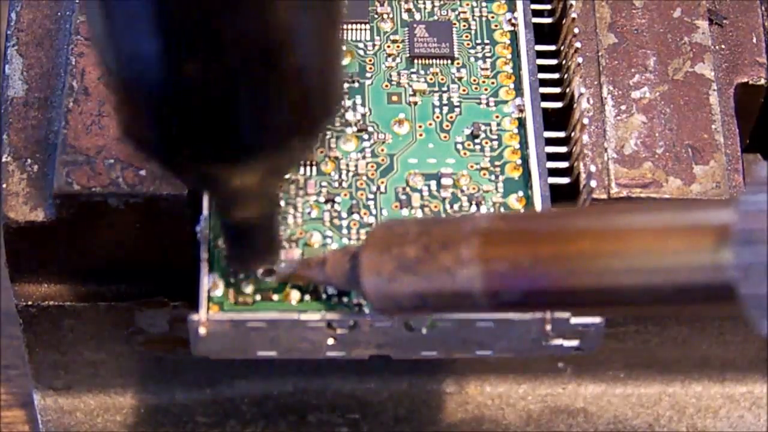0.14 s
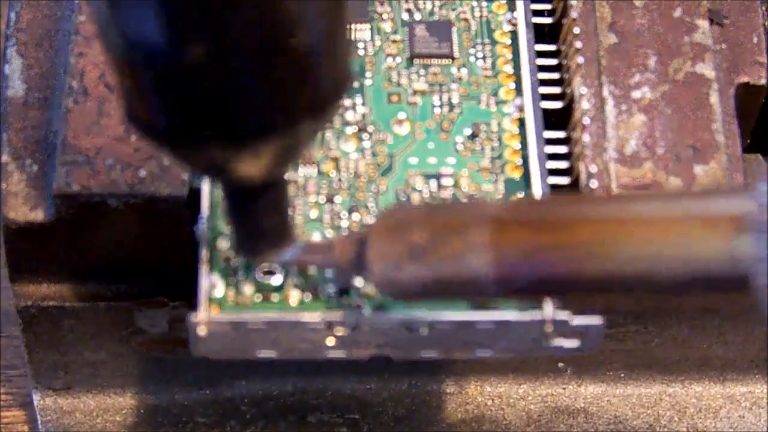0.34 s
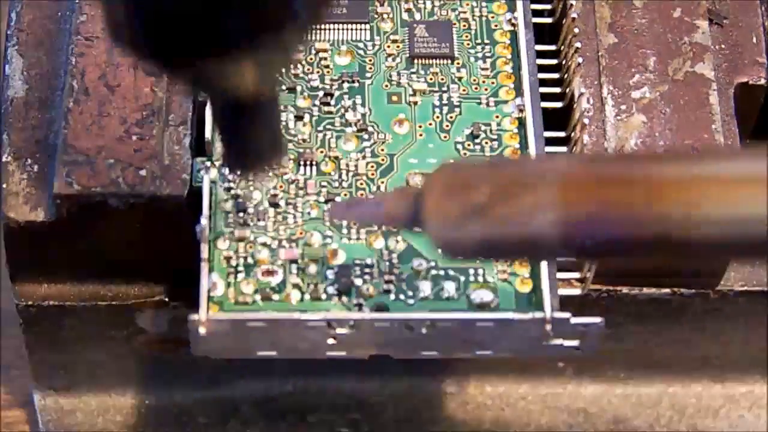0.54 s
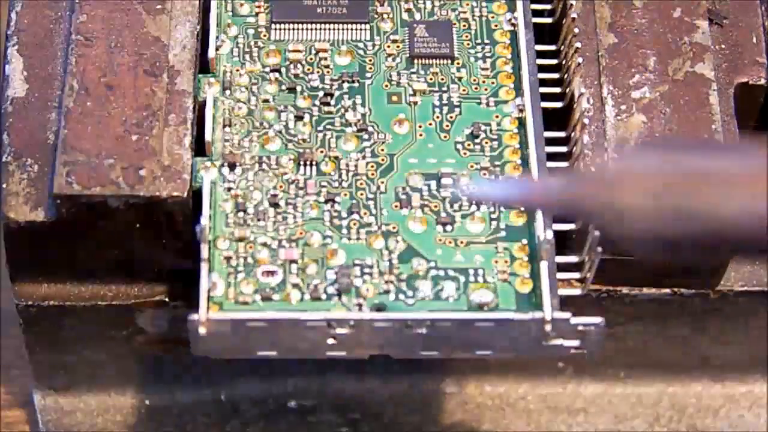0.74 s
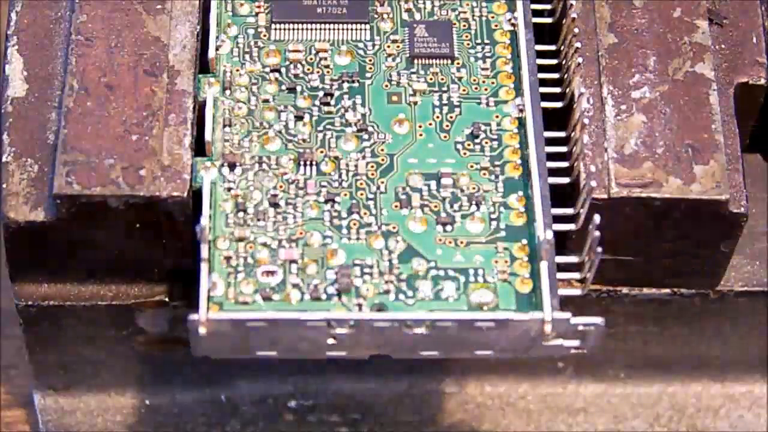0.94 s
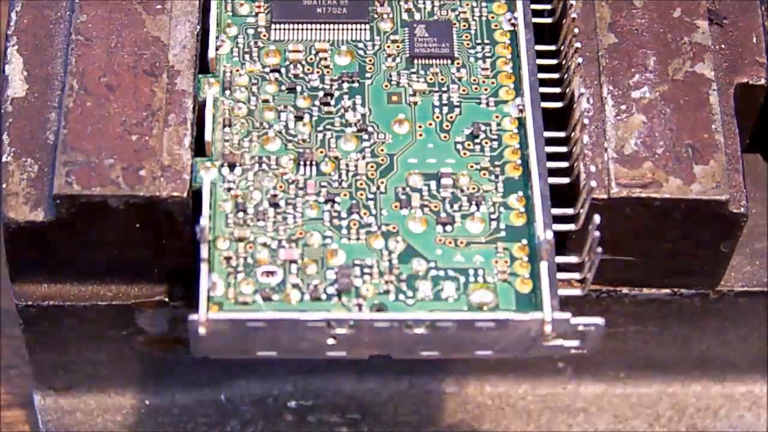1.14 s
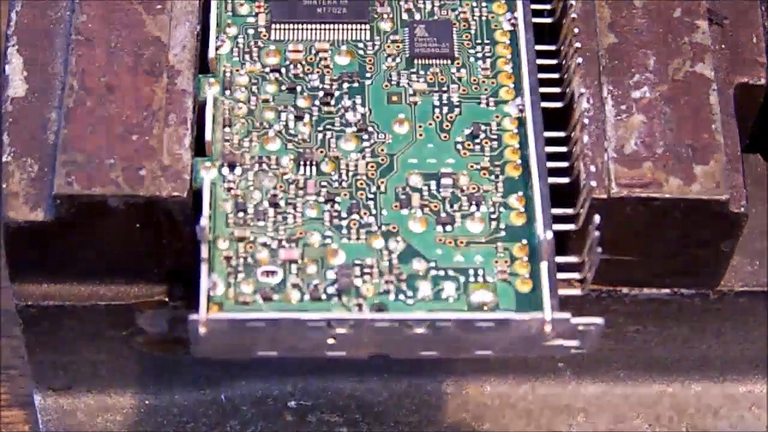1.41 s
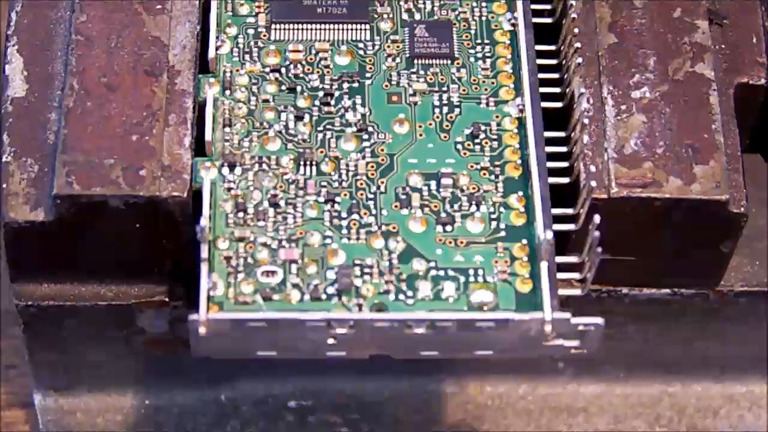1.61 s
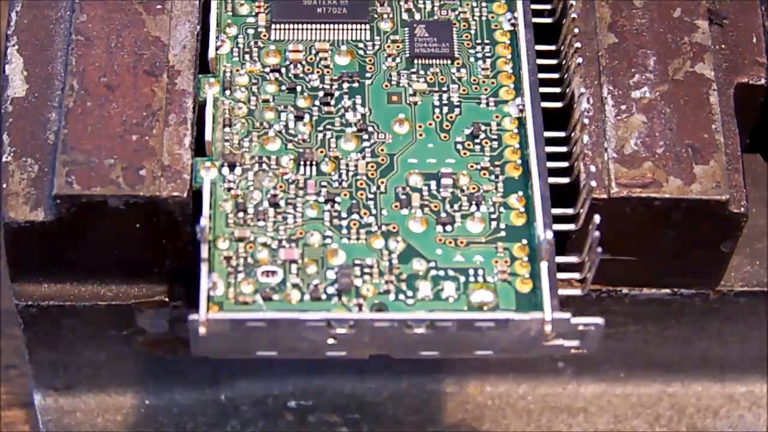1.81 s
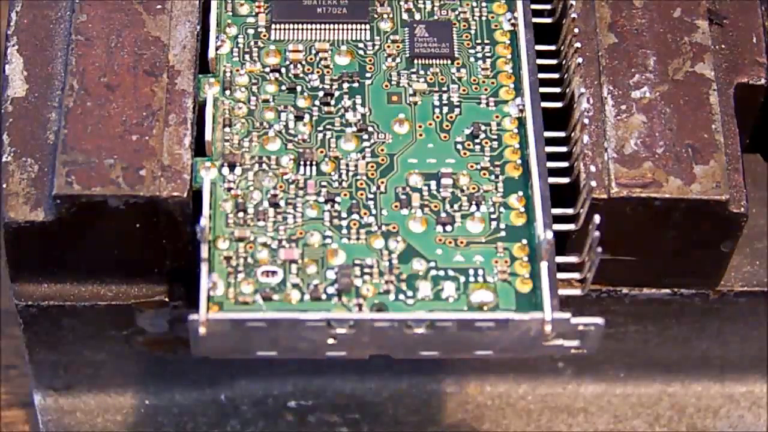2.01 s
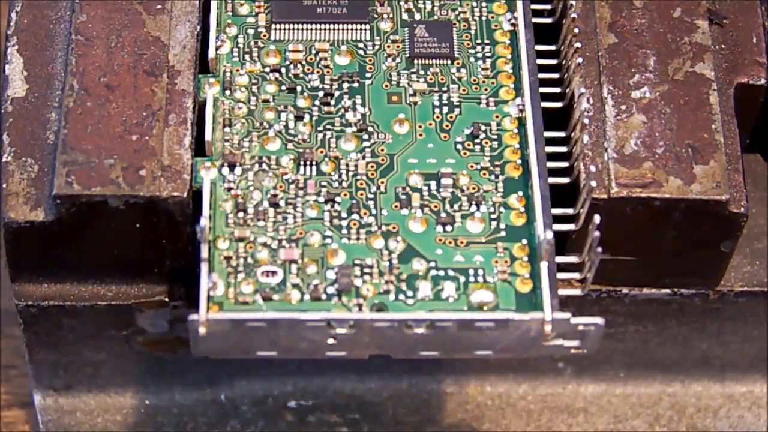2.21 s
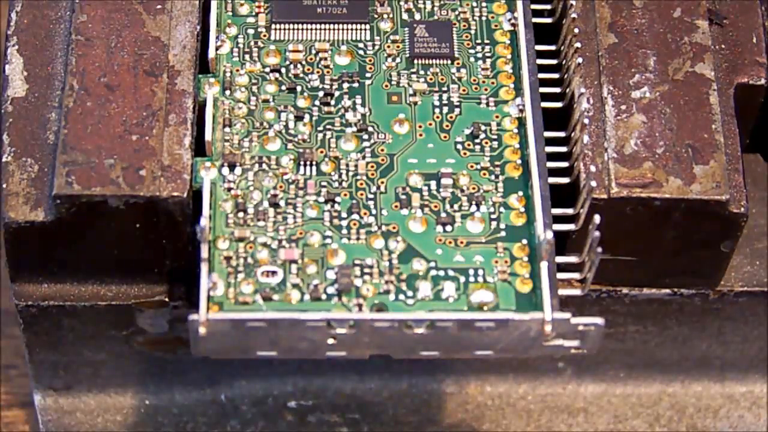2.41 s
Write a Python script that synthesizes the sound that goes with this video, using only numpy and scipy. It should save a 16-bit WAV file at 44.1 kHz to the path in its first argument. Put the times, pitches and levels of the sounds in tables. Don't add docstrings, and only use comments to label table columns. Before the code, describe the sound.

A solder pump snaps explosively at 0.2 s, its piston slamming and rebounding within about 15 milliseconds, with hollow barrel ring and low bench thud. The overloaded close microphone ducks, then recovers over the half-second room tail. Tiny ticks come before and after. Steady dull hiss and very faint hum remain. From 1.68 to 1.85 s a metal tool rattles onto the bench at left, bright, uneven clinks fading quickly.

```python
import sys
import numpy as np
from scipy import signal
from scipy.fft import rfft, irfft, next_fast_len
from scipy.io import wavfile
from scipy.ndimage import uniform_filter1d, map_coordinates

SR = 44100
rng = np.random.default_rng(int(sys.argv[2]) if len(sys.argv) > 2 else 0)


def volts_from_db(level):
    exponent = np.asarray(level, float) / 20
    return 10 ** exponent


def digitize_waveform(pressure):
    field = np.atleast_2d(pressure).T
    bounded = np.clip(field, -1, 1)
    quanta = np.round(bounded * 32767).astype(np.int16)
    wavfile.write(sys.argv[1], SR, quanta)


N = 112454

# pitch_hz, level_db (per Hz)
HISS_COLOUR = [(20, 0.5), (45, 0), (90, -4.5), (200, -5.5), (450, -15), (1000, -16), (7000, -23),
               (8000, -42)]
# pitch_hz, likeness (-1 to 1)
HISS_ALIKE = [(60, .2), (300, .5), (1400, 0.48), (7000, .4)]
# pitch_hz, width_hz, level_db
DISTANT_HUM = [(164.7, 14, -0.5), (392, 11.63, -1), (439.3, 13.7, -1), (620, 19.6, -9.5)]
# pitch_hz, width_hz, level_db
EARLIER_RING = [(1911, 43, -0.5), (2624, 92, 1), (3400, 61, -2.5), (4100, 80, -2), (4991, 68, -1),
                (5370, 96.4, -2.5), (623, 83, -8.5)]
# start_s, level_db, pitch_hz, length_cycles
TICKS = [(0.163, -45.5, 2800, 0.88), (.2032, -47.5, 2270, 3), (.234, -7, 4470, 3.4),
         (0.2403, -19.5, 4250, 5.8), (.433, -50, 4500, 0.68), (.4502, -28, 4200, 2.5),
         (.4504, -26, 7000, 1.1), (0.477, -58, 5230, 0.86), (.6806, -38, 3400, 0.91),
         (1.436, -48, 260, 2.5), (1.44, -46.5, 900, 1.5), (1.985, -43.5, 5640, 2)]
# start_s, level_db, chatter_s
SLAMS = [
    (.2082, -1, .0007),
    (.2089, 2, .0017),
    (.2127, -4, .0005),
    (.2161, 1.5, .0032),
    (.2235, -15, .004),
]
# pitch_hz, width_hz, level_db
BARREL = [(684, 140, -11), (1820, 220, 0.5), (2470, 340, -5.5), (3280, 340, -1), (3915, 410, -6.5),
          (4240, 110, -2.5), (4770, 430, -7.5), (5958, 89, -5.5), (6540, 33, -1), (6967, 55, 2)]
# pitch_hz, level_db (per Hz)
BARE_BLOW = [(120, -41.5), (200, -5.5), (1330, -12), (2560, -11.5), (2930, -12.5), (4760, -4), (7500, -7),
             (9750, -36.5), (16500, -120)]
# pitch_hz, level_db
SLAM_WIDTH = [(200, -13.5), (1000, -10), (3000, -9), (6000, 0.5)]
# pitch_hz, width_hz, level_db
THUD = [(199.8, 60, 3.5), (690, 110, -11), (850, 70, -6)]
# pitch_hz, level_db, fade_60db_s
BENCH = [(108, -10, .25), (129, -6.5, 0.35), (202.3, -2, 0.25), (65, -8, .3), (382.6, -4, 0.047),
         (520, -12, .08)]
# pitch_hz, width_hz, level_db
ECHO_BANDS = [(690, 120, -0.5), (820, 110, -1), (1970, 300, -0.5), (2620, 200, 1), (3783, 300, 1.5),
              (5200, 400, -2.5), (7000, 500, 2.5)]
# start_s, level_db, focus_hz (centre of the tones struck), shaft_db, boom_db
DROPS = [(1.6842, -13, 5300, -6.5, -25), (1.725, -22.5, 3400, -15, -23), (1.755, -28.5, 3060, -4, -12.5),
         (1.7676, -22.5, 3400, -12.5, -26.5), (1.7776, -17.5, 6700, -11, -25),
         (1.7801, -12.5, 4500, -16, -26), (1.779, -13, 2050, -21, -41), (1.794, -20, 5700, -18.5, -32),
         (1.8235, -16.5, 3520, -9.5, -33.5), (1.831, -14, 5360, -5.5, -31),
         (1.848, -18.5, 4200, -22.5, -20.5), (1.853, -20, 6030, -21, -31)]
# start_s, level_db, pitch_hz, length_cycles
STRIKES = [
    (1.6846, -17, 6640, 11),
    (1.6846, -16.5, 4880, 10),
    (1.725, -20.5, 6900, 7.7),
    (1.7682, -25, 7000, 5),
    (1.7775, -10.5, 6630, 6.7),
    (1.7775, -21.5, 5120, 12),
    (1.8226, -17, 5500, 2),
    (1.8244, -20, 5200, 4.8),
    (1.8307, -19, 5100, 5.6),
]
# pitch_hz, level_db, fade_60db_s
TOOL_TONES = [(2035, -12.5, 0.062), (2221, -19, 0.18), (2700, -12.5, .06), (3350, 2.5, 0.025),
              (3734, -7, .08), (4200, -8, .06), (4430, -4.5, 0.069), (4780, -12, 0.11), (5300, -7.5, 0.092),
              (5600, -25, 0.046), (6100, -7.5, .07), (6900, -15.5, 0.16), (6905, -1, 0.033),
              (7170, -28.5, 0.24)]
# pitch_hz, level_db, fade_60db_s
SHAFT_TONES = [(1148, -5.5, .08), (1284, 6, 0.03), (1429, 2.5, .07), (1467, -4.5, 0.12)]
# pitch_hz, level_db (per Hz)
CLATTER = [(150, -68), (500, -20.5), (1000, -19), (1400, -13), (2500, -4), (4500, -5.5), (6800, -0.5),
           (8000, -28)]
# pitch_hz, fade_60db_s
ROOM_FADE = [(100, .6), (700, 0.48), (3000, .5), (7500, .4)]
# pitch_hz, level_db
ROOM_COLOUR = [(60, -10), (250, 2), (550, -1.5), (750, 6), (1100, 2.5), (1700, 0.5), (3000, 0.5),
               (7000, -2)]
# pitch_hz, likeness (-1 to 1)
ROOM_ALIKE = [(60, 0.91), (240, 0.89), (950, 0.65), (3770, 0.04), (15000, -0.03)]
# pitch_hz, width_hz, depth (0 to 1)
MIC_DIPS = [(290, 113.3, 1), (972, 29, .8)]


def unit(x):
    return x / np.sqrt(np.mean(x ** 2) + 1e-20)


def along(points, hz):
    f, v = np.transpose(points)
    return np.interp(np.log(hz + 1), np.log(f + 1), v)


def filtered(x, response):
    n = x.shape[-1]
    m = next_fast_len(n + SR // 2)
    return irfft(rfft(x, m) * response(np.fft.rfftfreq(m, 1 / SR)), m)[..., :n]


def resonance(f, centre, width):
    return 1j * f * width / (centre * centre - f * f + 1j * f * width)


def resonant(peaks):
    return lambda f: sum((-1) ** k * volts_from_db(db) * resonance(f, c, w) for k, (c, w, db) in enumerate(peaks))


def pair(n, alike):
    turn = lambda hz: np.arccos(np.clip(along(alike, hz), -1, 1)) / 2
    shares = lambda hz: np.array([np.cos(turn(hz)), np.sin(turn(hz))])
    mid, side = filtered(rng.standard_normal((2, n)), shares)
    return np.array([mid + side, mid - side])


def ring(modes, t, extra_db=0):
    hz, db, t60 = np.transpose(modes)[:, :, None]
    luck = rng.standard_normal((len(modes), 2))
    level = volts_from_db(db + extra_db + 2 * luck[:, :1] - 60 * t / t60)
    return np.sum(level * np.sin(2 * np.pi * hz * t + luck[:, 1:]), 0)


def add(track, s, sound):
    part = track[..., round(s * SR):][..., :sound.shape[-1]]
    part += sound[..., :part.shape[-1]]


def clicks(rows):
    out, t = np.zeros(N), np.arange(SR // 20) / SR
    for s, db, hz, cycles in rows:
        add(out, s, volts_from_db(db) * np.exp(-t * hz / cycles) * np.sin(2 * np.pi * hz * t))
    return out


def room(x):
    hz, t, z = signal.stft(pair(SR, ROOM_ALIKE), SR, nperseg=256)
    fade_db = along(ROOM_COLOUR, hz)[:, None] - 60 * t / along(ROOM_FADE, hz)[:, None]
    tail = signal.istft(z * volts_from_db(fade_db), SR, nperseg=256)[1]
    late = np.pad(x, (300, 0))[None]
    return signal.fftconvolve(late, tail / np.linalg.norm(tail[0]), axes=1)[:, :N]


def background():
    t = np.arange(N) / SR
    hiss = unit(filtered(pair(N, HISS_ALIKE), lambda hz: volts_from_db(along(HISS_COLOUR, hz))))
    tail = unit(filtered(pair(N, ROOM_ALIKE), lambda hz: volts_from_db(along(CLATTER, hz))))
    old_ring = unit(filtered(pair(N, HISS_ALIKE), resonant(EARLIER_RING)))
    hum = unit(filtered(rng.standard_normal(N), resonant(DISTANT_HUM)))
    earlier_tap = volts_from_db(-57 - 60 * t / 0.46) * tail + volts_from_db(-54.5 - 60 * t / 0.94) * old_ring
    return volts_from_db(-56.5) * hiss + earlier_tap + volts_from_db(-71) * hum


def ticks():
    out = clicks(TICKS)
    return out * volts_from_db([[.8], [-.8]]) + volts_from_db(-6.5) * room(out)


def boom():
    rise_s, rough_db = 0.021, 7.5
    t = np.arange(SR // 2) / SR
    wander = map_coordinates(rng.standard_normal(40), [t * 60])
    return ring(BENCH, t) * (1 - np.exp(-t / rise_s)) * volts_from_db(rough_db * wander)


def pump():
    rise_s, fade_60db_s = 0.0015, .01
    slam_db, bare_db, thud_db, boom_db, room_db = 0.79, -4, -20.5, -27, -7
    t = np.arange(N) / SR
    force = np.zeros(N)
    for s, db, hold in SLAMS:
        fade = volts_from_db(db - 60 * np.clip(t - s - hold, 0, 9) / fade_60db_s)
        force += fade * np.clip((t - s) / rise_s + 1, 0, 1) ** 3
    barrel_and_blow = lambda hz: resonant(BARREL)(hz) + volts_from_db(bare_db + along(BARE_BLOW, hz))
    body = filtered(force * rng.standard_normal((2, N)), barrel_and_blow)
    mid, side = volts_from_db(slam_db) * body / np.abs(body[0]).max()
    side = filtered(side, lambda hz: volts_from_db(along(SLAM_WIDTH, hz)))

    first_s = SLAMS[0][0]
    impulse = 1.0 * (np.arange(N) == round(first_s * SR))
    echo_colour = lambda hz: volts_from_db(along(BARE_BLOW, hz)) * (0.5 + np.abs(resonant(ECHO_BANDS)(hz)))
    away = filtered(impulse, echo_colour)
    away = away * np.linalg.norm(mid) / np.linalg.norm(away)

    thud = filtered(np.gradient(force ** 2), resonant(THUD))
    low = volts_from_db(thud_db) * thud / np.abs(thud).max()
    add(low, first_s, volts_from_db(boom_db) * boom())
    return np.array([mid + side + low, mid - side + low]) + volts_from_db(room_db) * room(away)


def tool():
    focus_octaves, focus_depth_db, grit_db = 0.16, 13, 0
    crack_db, crack_60db_s, rattle_db, rattle_60db_s = -11.5, .004, -7, 0.085
    left_db, left_lead_s, room_db = 9, .00016, -16.5
    near, low, t = clicks(STRIKES), np.zeros(N), np.arange(SR // 3) / SR
    for s, db, focus_hz, shaft_db, boom_db in DROPS:
        octaves_off = lambda hz: np.log2(hz / focus_hz + 1e-6)
        focus_db = lambda hz: focus_depth_db * (np.exp(-(octaves_off(hz) / focus_octaves) ** 2) - 1)
        lumps = volts_from_db(grit_db * unit(uniform_filter1d(rng.standard_normal(len(t)), size=40)))
        grit_colour = lambda hz: volts_from_db(along(CLATTER, hz) + .5 * focus_db(hz))
        grit = unit(filtered(lumps * rng.standard_normal(len(t)), grit_colour))
        crack = volts_from_db(crack_db - 60 * t / crack_60db_s)
        rattle = volts_from_db(rattle_db - 60 * t / rattle_60db_s)
        tip = ring(TOOL_TONES, t, focus_db(np.array(TOOL_TONES)[:, :1]))
        metal = (tip + grit * (crack + rattle)) * (1 - np.exp(-t / 0.00012))
        shaft = ring(SHAFT_TONES, t) * (1 - np.exp(-t / 0.0028))
        add(near, s, volts_from_db(db - 7.5) * (metal + volts_from_db(shaft_db) * shaft))
        add(low, s, volts_from_db(db + boom_db) * boom())
    sides = filtered(near, lambda hz: np.exp(1j * np.pi * hz * left_lead_s * np.array([[1], [-1]])))
    return sides * volts_from_db([[left_db / 2], [-left_db / 2]]) + low + volts_from_db(room_db) * room(near)


def scene():
    return background() + ticks() + pump() + tool()


def top_cut(x):
    return signal.sosfilt(signal.butter(12, 16840, fs=SR, output="sos"), x)


def record(dry):
    edge_hz, edge_order, top_hz = 8040, 26, 16300
    overload, knee = .5, 24
    duck_db, duck_lag_s, recover_db_per_s = 18.5, 0.021, 164.5
    dips = lambda f: np.prod([1 - np.clip(d, 0, 1) * resonance(f, c, w) for c, w, d in MIC_DIPS], 0)
    x = filtered(dry, lambda f: dips(f + 1) / (1 + (f / edge_hz) ** (2 * edge_order)))

    t = np.arange(N) / SR
    duck_s = np.argmax(np.abs(x).max(0) > overload) / SR + duck_lag_s
    recovery_db = np.clip(duck_db - recover_db_per_s * (t - duck_s), 0, None)
    onset = np.clip((t - duck_s) / .008 + 1, 0, 1)
    x = x * volts_from_db(-recovery_db * onset)

    clipped = x / (1 + np.abs(x) ** knee) ** (1 / knee)
    mix = filtered(clipped, lambda f: 1 / (1 + (f / top_hz) ** 140))
    return top_cut(mix)


dry = scene()
out = record(dry)
digitize_waveform(out)
```